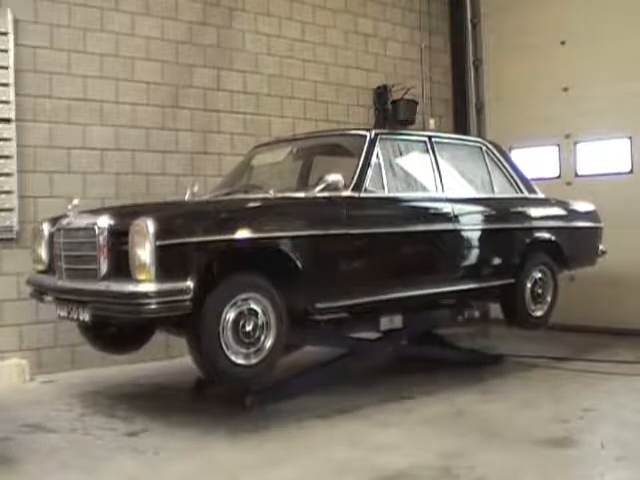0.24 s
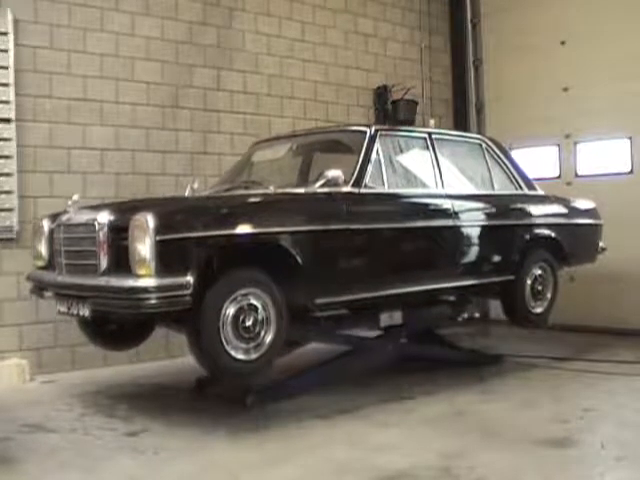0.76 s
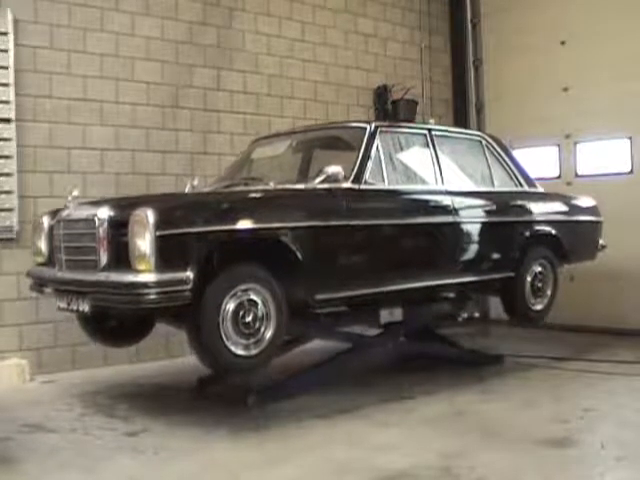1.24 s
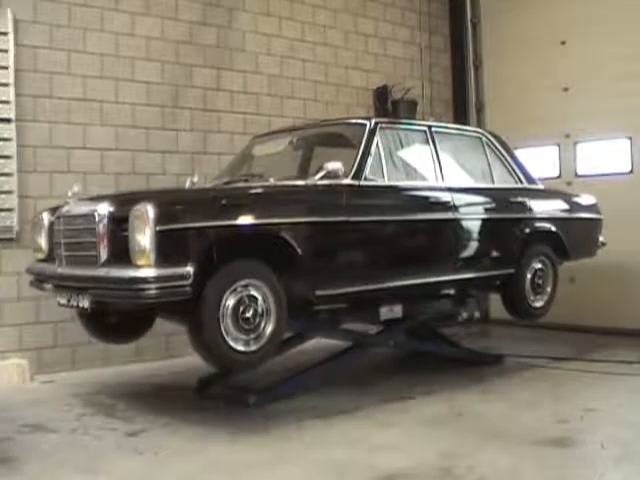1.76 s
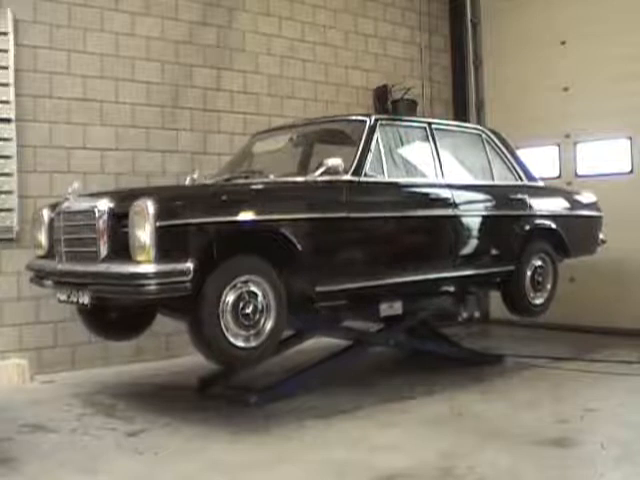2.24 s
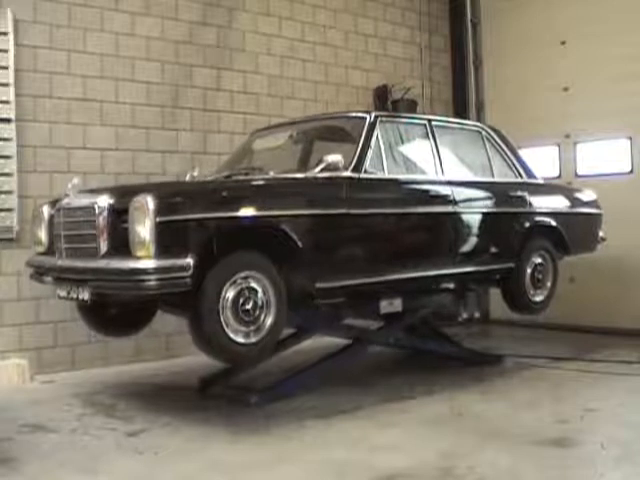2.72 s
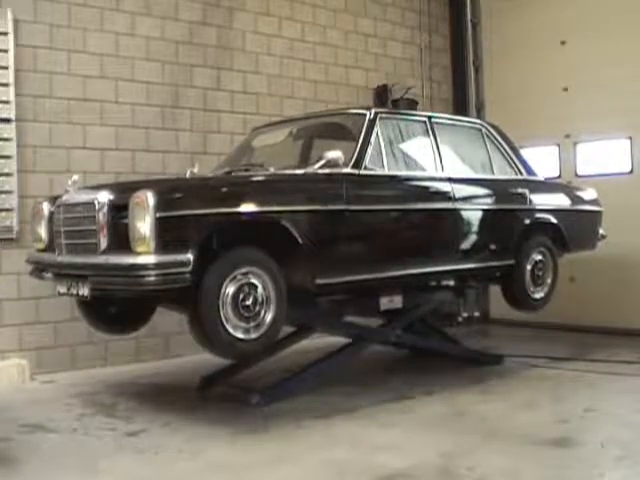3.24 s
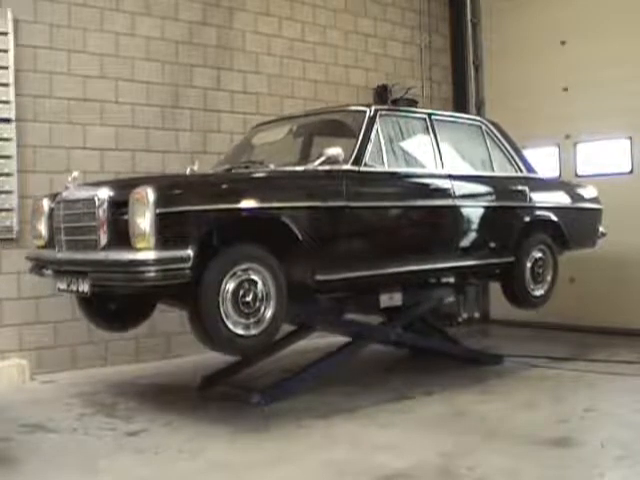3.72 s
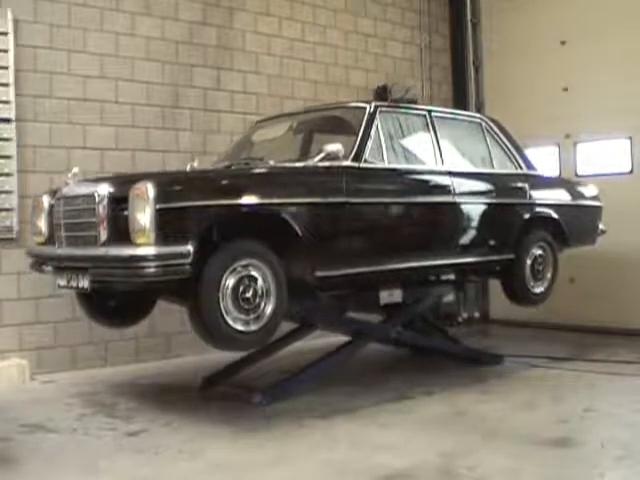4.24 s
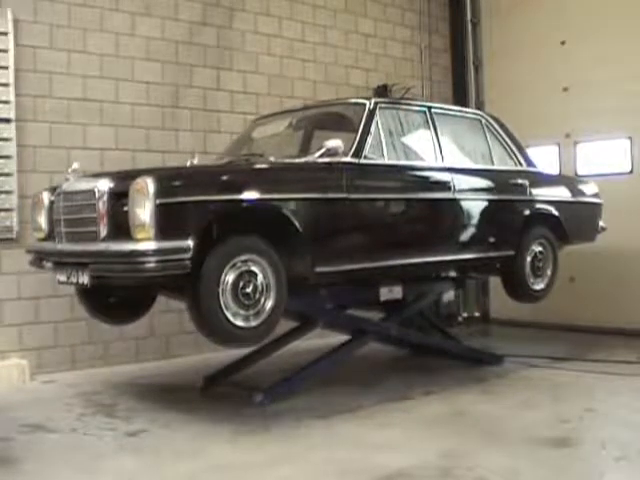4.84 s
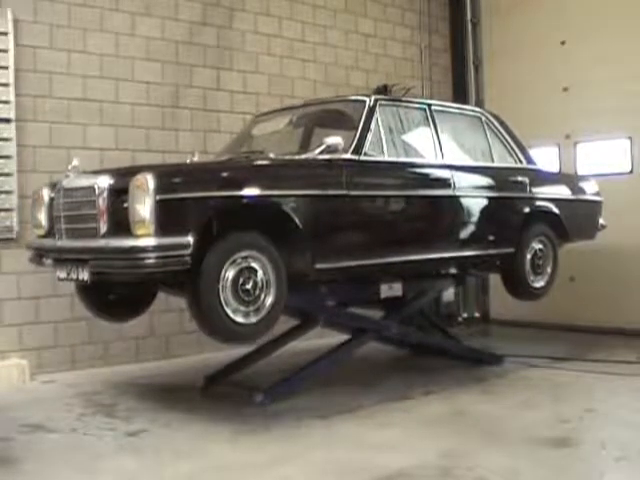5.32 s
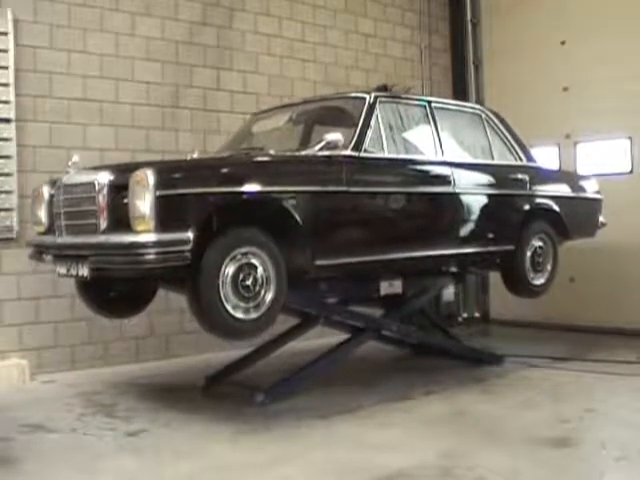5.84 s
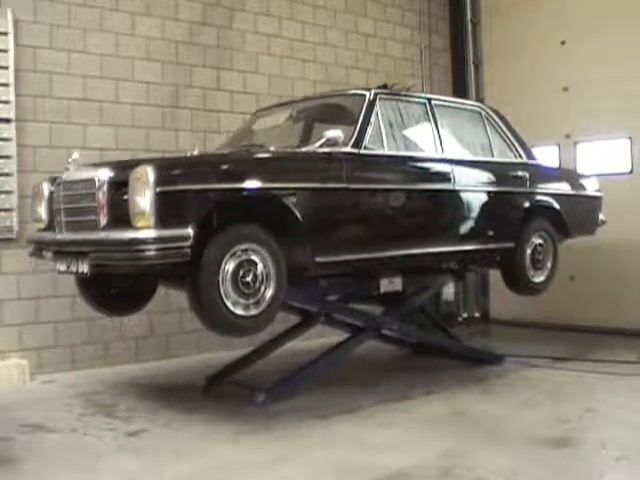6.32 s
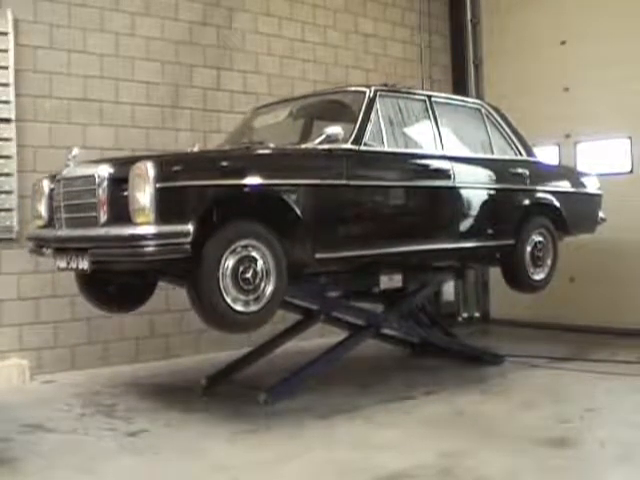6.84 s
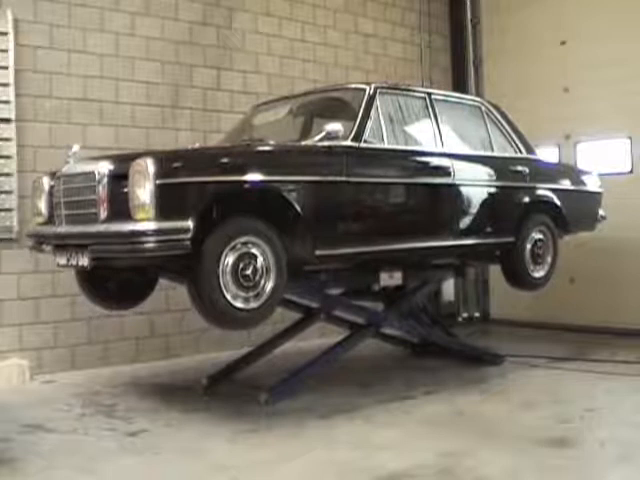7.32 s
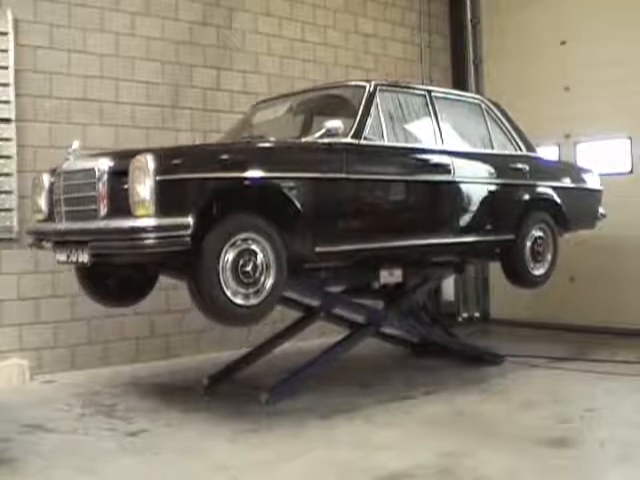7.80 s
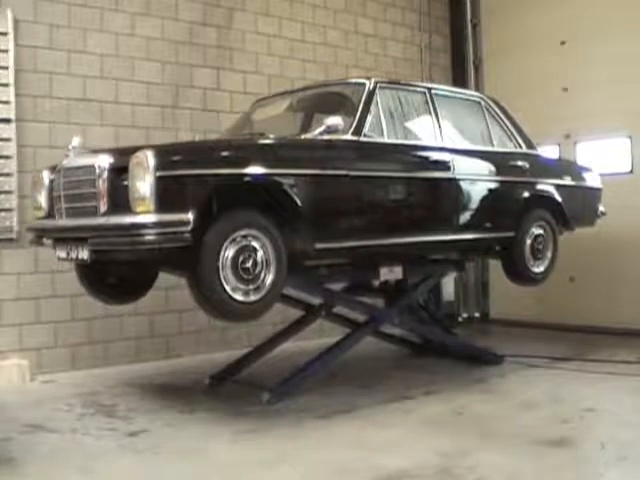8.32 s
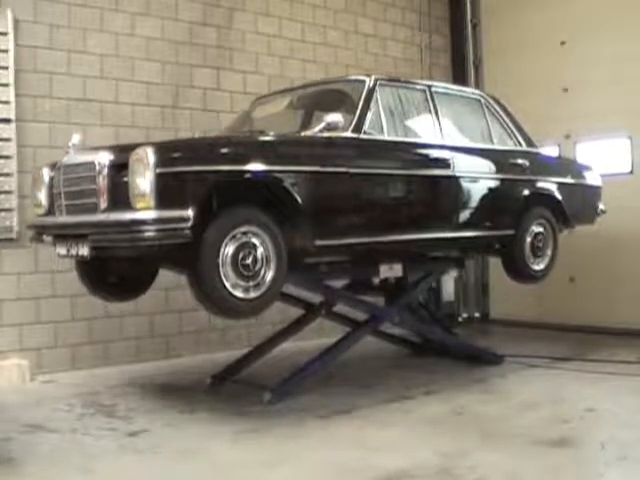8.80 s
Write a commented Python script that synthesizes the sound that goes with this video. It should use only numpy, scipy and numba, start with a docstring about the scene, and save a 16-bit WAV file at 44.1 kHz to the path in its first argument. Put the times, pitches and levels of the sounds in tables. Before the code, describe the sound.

An electric hydraulic pump runs steadily as a scissor lift raises a car a few metres from the microphone. Its buzzing whine sits over a rush of oil, a faint hum and a low room rumble. Three times, about four seconds apart, the safety catch drops with a sharp steel clack that rings and echoes briefly in the brick garage.

```python
"""Car lift in a brick garage

A scissor lift raises a car a few metres away. An electric motor turns a nine-tooth gear pump:
its meshing teeth whine and buzz once a turn, over mains hum, rushing oil and a low room rumble.
Three times the safety catch (the pawl) drops into the next tooth of its rack, bounces once,
and rings through the steel frame and the room."""
import sys
import numpy as np
from scipy import signal
from scipy.fft import rfft, irfft, next_fast_len
from scipy.io import wavfile
from numba import njit

SR = 44100
rng = np.random.default_rng(int(sys.argv[2]) if len(sys.argv) > 2 else 0)


def generate_wav(sig):
    """Save sig (samples, or channels by samples) to the path in sys.argv[1] as 16-bit PCM at SR."""
    pcm = np.round(np.clip(np.atleast_2d(sig).T, -1, 1) * 32767).astype(np.int16)
    wavfile.write(sys.argv[1], SR, pcm)


N = 399546

TEETH, HARMONICS = 9, 30  # a harmonic is a whole multiple of the rate at which the teeth meet
# Motor speed, creeping up as the load eases: (time [s], shaft speed [turns/s])
SHAFT_SPEED = [(0, 48.745), (1.7, 48.85), (3.5, 48.91), (4.6, 48.927), (6.3, 48.975), (9.06, 49.005)]
# The pump's strong harmonics and their sidebands, the tones one shaft rate below and above:
# (harmonic number, level [dB], lower sideband [dB], upper sideband [dB])
PUMP_TONES = [(1, -44.5, -67.5, -74), (2, -51, -64, -80), (3, -56, -64, -71), (4, -48.5, -62.5, -59),
              (5, -53, -50.5, -47.5), (6, -44.5, -45.5, -49), (7, -47.5, -56, -53),
              (8, -47.5, -50.5, -50.5), (9, -63, -57.5, -57.5), (10, -56, -64.5, -66), (11, -61, -63, -62),
              (12, -51, -53, -54.5), (13, -68, -47, -55), (14, -42.5, -47.5, -46.5), (15, -55, -59, -62.5)]
# The harmonics that throb most clearly with each turn: (harmonic number)
THROBBING = [5, 6, 7]
# Sidebands boosted by the tank's resonances: (multiple of shaft rate, start level [dB], end level [dB])
TANK_TONES = [(8, -67, -52), (10, -72, -58), (11, -54.5, -56.5), (24, -54.5, -57), (25, -60, -50),
              (34, -60, -57), (47, -44, -45.5), (50, -55, -51), (60, -57, -63), (103.3, -57, -62),
              (126.56, -40, -52.5)]
# The deepest whine starts loud and is faintest a little past halfway: (time [s], relative level [dB])
DEEP_WHINE_LEVEL = [(0.0, -37), (1.51, -33.5), (2.9, -45.5), (3.83, -45), (5.38, -55), (6.99, -45),
                    (8.7, -52), (8.75, -48.5)]
# Slow swells of the strong harmonics:
# (harmonic number, swing [dB], period [s], time of a crest [s], trend [dB/s])
SWELLS = [(2, 2.2, 9.8, 0.1, 0.06), (4, 3.6, 6.35, 0.8, -0.05), (5, 1.7, 5.0, 2.65, -0.7),
          (6, 1.6, 3.5, 3.06, 0), (7, 1.4, 1.95, 1.15, 0.4), (8, 2.4, 4.75, 1.2, 0.65),
          (12, 2.8, 6.05, 4.1, 0), (13, 1.7, 2.4, 0.62, -0.45), (14, 1.2, 1.7, 0.9, -0.2)]
# The motor's magnetic hum: (frequency [Hz], level [dB])
HUM_TONES = [(100, -72), (150, -69.5), (200, -67), (300, -66), (400, -66), (500, -50.5), (600, -74),
             (1200, -66)]
# The hum grows near the top of the lift's travel: (time [s], level change [dB])
HUM_LEVEL = [(0, -3.5), (3, -1), (6.3, -1), (7.7, 3.5), (9.06, 5)]
# Oil rushing through pump and valves, plus the fan: (frequency [Hz], level [dB])
RUSH_SPECTRUM = [(250, -8.5), (450, 4), (700, -3), (1020, -4.5), (1220, 0.5), (1700, 2), (1940, -1),
                 (2350, 5), (2850, -3.5), (3550, 1), (4500, -5), (5400, -17), (6200, -25), (7700, -6.5),
                 (13000, -32)]
# Oil squeezing through the valve: (lower edge [Hz], upper edge [Hz], level [dB])
VALVE_BAND = (5250, 6750, -49.7)
# A narrow gap in the sound of motor, pump and oil: (frequency [Hz], level change [dB])
POWER_UNIT_DIP = [(1330, 0), (1400, -6), (1445, -33), (1490, -33), (1540, -6.5), (1620, 0)]
# The room's low rumble: (frequency [Hz], level [dB])
RUMBLE_SPECTRUM = [(15, -11), (26, 1.5), (32, 6.5), (38, -8), (50, 1.5), (75, -1), (190, -0.5), (300, -1),
                   (600, -3), (1300, -44)]
# A faint steady hiss: (frequency [Hz], level [dB])
HISS_SPECTRUM = [(300, -1), (600, 4.5), (1400, -11), (2400, 0), (4500, -4), (6000, 1), (8000, 4),
                 (10500, -3.5), (13000, -26)]
# Each drop of the pawl: (time [s], level [dB], clack pitch [Hz], clack level [dB],
# pawl ring level [dB], ring brightness [dB/octave], bounce delay [s], bounce level [dB])
DROPS = [(1.1002, -13.5, 1450, 7.5, -2, -2.5, 0.024, -4.5), (4.9537, -14, 1860, 7.5, -1.5, 4, .019, -1.5),
         (8.8232, -13, 2240, 8, -15, 3, 0.024, -3)]
# The crack of steel on steel: (frequency [Hz], level [dB])
CRACK_SPECTRUM = [(60, -35), (180, -33), (400, -11), (600, -6), (1000, -6.5), (1500, 1.5), (2600, 4),
                  (4000, 2), (4900, 4), (6300, 5), (7300, 3), (8000, -10), (10400, -9.5), (13000, -62)]
# The tones at which the pawl rings: (frequency [Hz], width [Hz], level [dB])
PAWL_MODES = [(2820, 55, -4.5), (3162, 52, 1), (3207, 40, 0), (5560, 27, -12), (5670, 76, 1.5),
              (5920, 50, -21), (6860, 33, -18)]
# The tones at which the lift's frame rings: (frequency [Hz], width [Hz], level [dB])
FRAME_MODES = [(349, 14, -23.5), (421, 27, -8), (511, 50, -5), (769, 23.5, 2), (1270, 51, -6),
               (2323, 54, -5), (2560, 63, -13), (4440, 42, -5.5), (8750, 90, -12)]
# How long the garage echoes: (frequency [Hz], time to fade by 60 dB [s])
ECHO_TIMES = [(150, 0.74), (800, 0.86), (3000, 0.77), (6000, 0.69), (8000, .52), (12000, 0.29)]
# The microphone's housing makes one side louder: (frequency [Hz], left minus right [dB])
STEREO_BALANCE = [(7000, 0), (9000, 4), (11000, 10), (13000, 3)]
# How far the left side's wave runs ahead of the right: (frequency [Hz], phase lead [radians])
STEREO_LEAD = [(300, 0.0061), (2200, 0.0078), (5500, 0.039), (7400, 0.2), (8350, 1.43), (9000, 0.99),
               (10000, 0.85), (10700, 8.5), (11500, 4.55)]
# The share of the reflections that differs between left and right: (frequency [Hz], level [dB])
STEREO_SPREAD = [(400, -41), (700, -30), (2200, -28), (5000, -23), (6500, -23), (8000, -13), (12000, -11)]


def undb(db):
    """Turn decibels into a gain to multiply by."""
    return 10 ** (np.asarray(db) / 20)


def unit(x):
    """Scale a signal to an average (rms) size of 1."""
    return x / np.sqrt(np.mean(x ** 2))


def at_time(points, t):
    """Read a (time, value) table at the times t."""
    return np.interp(t, *np.transpose(points))


def at_hz(points, hz):
    """Read a (frequency, value) table, with octaves evenly spaced."""
    f, value = np.transpose(points)
    return np.interp(np.log(np.maximum(hz, 1)), np.log(f), value)


def colour(x, spectrum):
    """Filter a signal by a (frequency, level) table."""
    size = next_fast_len(len(x) + 4096)
    gain = undb(at_hz(spectrum, np.fft.rfftfreq(size, 1 / SR)))
    return irfft(rfft(x, size) * gain, size)[:len(x)]


def wander(t, rate, count):
    """Smooth random curves of typical size 1, one a row, from `rate` random values a second."""
    knots = np.arange(-2, t[-1] * rate + 2)
    weights = np.exp(-(t * rate - knots[:, None]) ** 2)
    weights /= np.sqrt(np.sum(weights ** 2, axis=0))
    return rng.standard_normal((len(knots), count)).T @ weights


@njit
def shaft_tones(rotation, gains, hop):
    """Add one tone per multiple of the shaft rate, gliding between complex gains set `hop` apart."""
    out = np.zeros(len(rotation))
    for frame in range(len(gains) - 1):
        spin = rotation[frame * hop:(frame + 1) * hop]
        tone = spin.copy()
        for k in range(gains.shape[1]):
            gain = gains[frame, k]
            slope = (gains[frame + 1, k] - gain) / hop
            for i in range(len(spin)):
                out[frame * hop + i] += ((gain + slope * i) * tone[i]).real
                tone[i] *= spin[i]  # step up to the next multiple
    return out


def pump_levels(overtone_db=-60.3, overtone_fall_db=0.9, sideband_db=-63.5, sideband_fall_db=1.1):
    """Levels of each harmonic and its two sidebands; past the table's end they fall away evenly."""
    steps = np.arange(HARMONICS - len(PUMP_TONES))
    overtones = overtone_db - overtone_fall_db * steps
    sidebands = sideband_db - sideband_fall_db * steps
    return np.vstack([np.array(PUMP_TONES)[:, 1:], np.transpose([overtones, sidebands, sidebands])])


def standing_waves(t):
    """The rising car shifts the room's loud and quiet spots, so harmonics swell and sink (in dB)."""
    swell = np.zeros((HARMONICS, len(t)))
    whine_db = at_time(DEEP_WHINE_LEVEL, t)
    swell[0] = whine_db - whine_db.mean()
    for number, swing_db, period_s, crest_s, trend in SWELLS:
        wave = np.cos(2 * np.pi * (t - crest_s) / period_s)
        swell[round(number) - 1] = swing_db * wave + trend * (t - t.mean())
    return swell


def shaft_angle(t):
    """How far the motor has turned, in radians."""
    return 2 * np.pi * np.cumsum(at_time(SHAFT_SPEED, t)) / SR


def gear_pump(t, falloff_db=4.5, drift_db=2.8, drift_radians=0.59, drift_rate=1.794,
              flutter=0.098, throb_radians=2.13, hop=256):
    """Meshing teeth whine; their unevenness repeats each turn and puts sidebands round each harmonic."""
    frame_times = np.arange(N // hop + 2) * hop / SR
    count = TEETH * HARMONICS + TEETH // 2
    multiples = np.arange(1, count + 1)
    # each multiple of the shaft rate belongs to its nearest harmonic
    harmonic = np.maximum(np.round(multiples / TEETH).astype(int), 1)
    row = harmonic - 1
    offset = multiples - TEETH * harmonic
    centre_db, below_db, above_db = pump_levels()[row].T
    sideband_db = np.where(offset < 0, below_db, above_db) - falloff_db * (abs(offset) - 1)
    db = np.where(offset == 0, centre_db, sideband_db)[:, None] + standing_waves(frame_times)[row]
    for multiple, start_db, end_db in TANK_TONES:
        db[round(multiple) - 1] = np.linspace(start_db, end_db, len(frame_times))
    # reflections make level and phase drift; short waves feel the moving car most
    drift = np.minimum(multiples / 70, 1)[:, None]
    db += drift_db * drift * wander(frame_times, drift_rate, count)
    # sidebands that stay roughly in step pulse once a turn
    scatter = np.where(np.isin(harmonic, THROBBING), throb_radians, np.pi)
    start_phase = rng.uniform(0, 2 * np.pi, HARMONICS)[row] + scatter * rng.uniform(-1.11, 1, count)
    # each harmonic arrives by its own path, so it pulses at its own point of the turn
    start_phase += offset * rng.uniform(0, 2 * np.pi, HARMONICS)[row]
    phase = start_phase[:, None] + drift_radians * drift * wander(frame_times, drift_rate, count)
    # no two turns are quite alike, which roughens the high tones most
    wobble = wander(frame_times, 60, count) + 1j * wander(frame_times, 60, count)
    ripple = 1 + flutter * np.minimum(multiples / 75, 2)[:, None] * wobble
    gains = np.sqrt(2) * undb(db) * ripple * np.exp(1j * phase)
    return shaft_tones(np.exp(1j * shaft_angle(t)), np.ascontiguousarray(gains.T), hop)


def motor_hum(t, mains_hz=50):
    """The motor's magnetism hums at whole multiples of the mains frequency."""
    hum = np.zeros(N)
    for hz, db in HUM_TONES:
        locked_hz = mains_hz * round(hz / mains_hz)
        hum += undb(db) * np.sin(2 * np.pi * (locked_hz * t + rng.random()))
    return np.sqrt(2) * hum * undb(at_time(HUM_LEVEL, t))


def oil_rush(t, level_db=-47, throb_db=-1.0):
    """Flowing oil makes a noise that throbs with each turn of the shaft."""
    throb = undb(throb_db * np.cos(shaft_angle(t)))
    return undb(level_db) * unit(colour(rng.standard_normal(N) * throb, RUSH_SPECTRUM))


def valve_hiss(t, waver_db=-2.0):
    """The jet of oil in the valve makes a bright hiss that wavers a little."""
    low_hz, high_hz, db = VALVE_BAND
    band = signal.butter(2, [low_hz, high_hz], "band", fs=SR, output="sos")
    jet = signal.sosfilt(band, rng.standard_normal(N))
    return unit(jet) * undb(db + waver_db * wander(t, rate=6, count=1)[0])


def room_rumble(t, level_db=-53, side_db=-14, swell_db=2.5, swell_at_s=8.2, swell_width_s=0.2):
    """The garage rumbles almost alike on both sides, steady but for one dull swell."""
    middle = unit(colour(rng.standard_normal(N), RUMBLE_SPECTRUM))
    side = undb(side_db) * unit(colour(rng.standard_normal(N), RUMBLE_SPECTRUM))
    swell = swell_db * np.exp(-((t - swell_at_s) / swell_width_s) ** 2)
    return undb(level_db + swell) * np.array([middle + side, middle - side])


def wide_hiss(level_db=-59.0):
    """A faint steady hiss, different on left and right."""
    sides = [unit(colour(rng.standard_normal(N), HISS_SPECTRUM)) for _ in range(2)]
    return undb(level_db) * np.array(sides)


def garage_echo(t, early_db=-3.5, early_s=0.011):
    """The brick room answers a blow with strong first reflections, then a tail whose treble dies first."""
    hz = np.fft.rfftfreq(len(t), 1 / SR)
    noise = rfft(rng.standard_normal(len(t)))
    centres, fade_times = np.transpose(ECHO_TIMES)
    tail = np.zeros(len(t))
    for one_band, fade_s in zip(np.eye(len(centres)), fade_times):
        band_gain = at_hz(list(zip(centres, one_band)), hz)
        tail += irfft(noise * band_gain, len(t)) * undb(-60 * t / fade_s)
    return tail * (1 + undb(early_db) * np.exp(-t / early_s) / 2)


def ring(blow, modes):
    """Struck steel rings at its own tones, given as (frequency, width, level) rows."""
    return sum(undb(db) * signal.lfilter(*signal.iirpeak(hz, hz / width, fs=SR), blow)
               for hz, width, db in modes)


def pawl_drops(crack_db=-5, snap_db=-2, snap_s=0.0013, clack_width_hz=300, clack_s=0.14,
               pawl_db=12, pawl_centre_hz=4200, frame_db=7):
    """The pawl hits the rack and bounces; each clack is higher as the rack's free end gets shorter."""
    t = np.arange(SR) / SR
    out = np.zeros(N + 2 * SR)
    snap = 1 + undb(snap_db) * np.exp(-t / snap_s)  # the direct sound leads the echo
    for time_s, db, clack_hz, clack_db, ring_db, brightness, bounce_s, bounce_db in DROPS:
        pawl_modes = [(hz, width, mode_db + brightness * np.log2(hz / pawl_centre_hz))
                      for hz, width, mode_db in PAWL_MODES]
        for delay_s, blow_db in ((0, 0), (bounce_s, bounce_db)):
            # each part reaches the room by its own paths, so each gets its own echo
            crack = undb(crack_db) * colour(garage_echo(t) * snap, CRACK_SPECTRUM)
            clack = ring(garage_echo(t), [(clack_hz, clack_width_hz, clack_db)]) * np.exp(-t / clack_s)
            pawl = undb(pawl_db + ring_db) * ring(garage_echo(t), pawl_modes)
            frame = undb(frame_db) * ring(garage_echo(t), FRAME_MODES)
            start = int((time_s + delay_s) * SR)
            out[start:start + SR] += undb(db + blow_db) * (crack + clack + pawl + frame)
    return out[:N]


def stereo_microphone(x, reflections_s=0.016):
    """Two close openings hear nearly the same; housing and reflections set their top treble apart."""
    size = next_fast_len(N + 4096)
    hz = np.fft.rfftfreq(size, 1 / SR)
    tilt = undb(at_hz(STEREO_BALANCE, hz) / 2)
    direct = np.array([tilt, np.exp(-1j * at_hz(STEREO_LEAD, hz)) / tilt])
    reflections = rng.standard_normal(4096) * np.exp(-np.arange(4096) / SR / reflections_s)
    side = rfft(reflections / np.linalg.norm(reflections), size) * undb(at_hz(STEREO_SPREAD, hz))
    return irfft(rfft(x, size) * (direct + np.array([side, -side])), size)[:, :N]


def scene():
    """Pump, motor and oil run throughout while the pawl drops, over room rumble and a faint hiss."""
    t = np.arange(N) / SR
    power_unit = undb(-0.5) * gear_pump(t) + motor_hum(t) + oil_rush(t) + valve_hiss(t)
    lift = colour(power_unit, POWER_UNIT_DIP) + pawl_drops()
    return stereo_microphone(lift) + room_rumble(t) + wide_hiss()


def record(dry):
    """The very highest treble is cut off steeply."""
    top_hz = 13400
    return signal.sosfilt(signal.ellip(8, .2, 80, top_hz, fs=SR, output="sos"), dry)


dry = scene()
out = record(dry)
generate_wav(out)
```